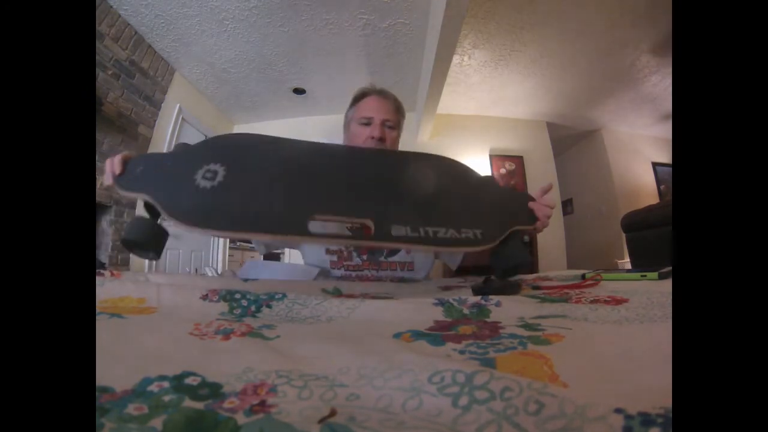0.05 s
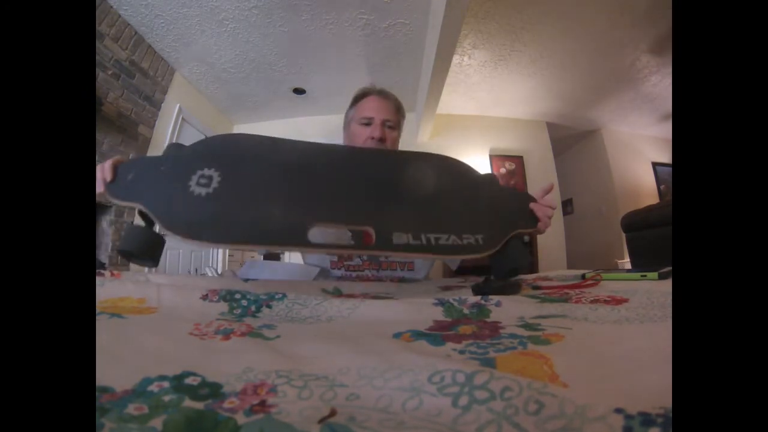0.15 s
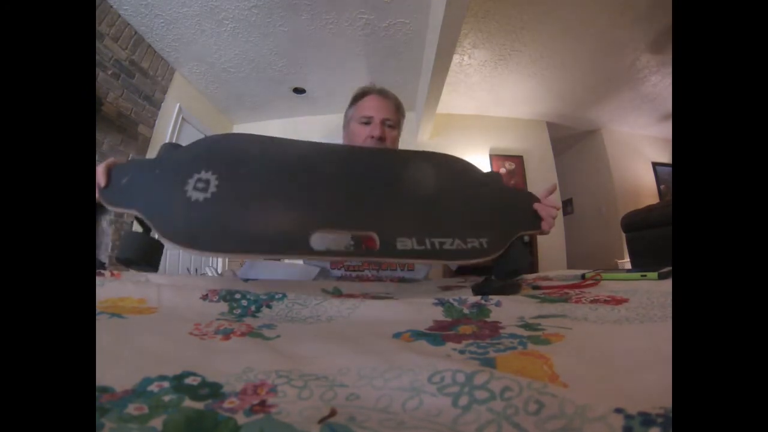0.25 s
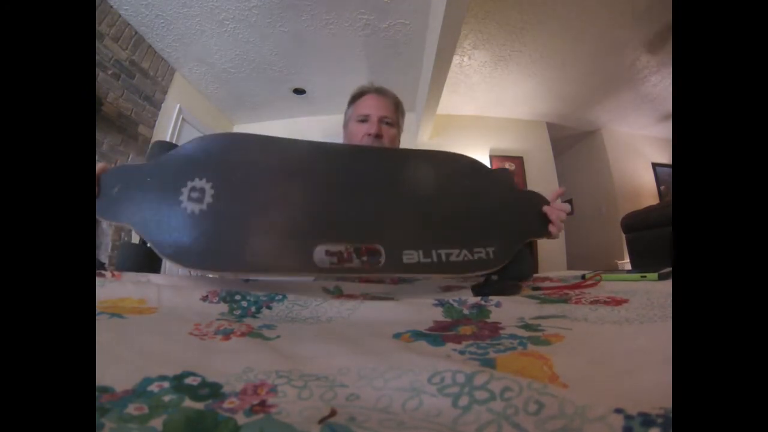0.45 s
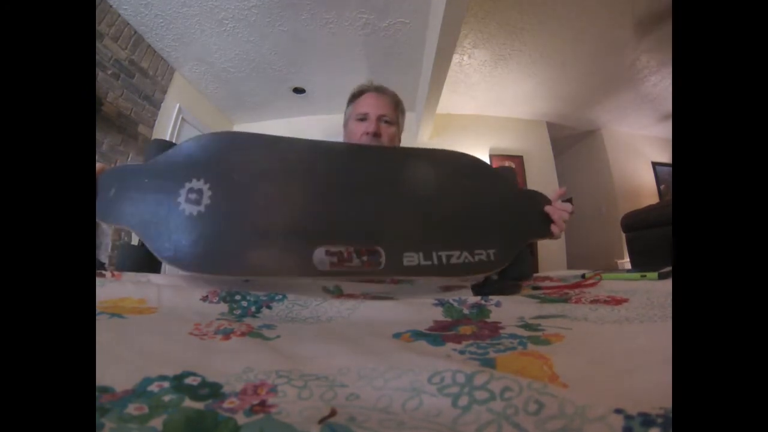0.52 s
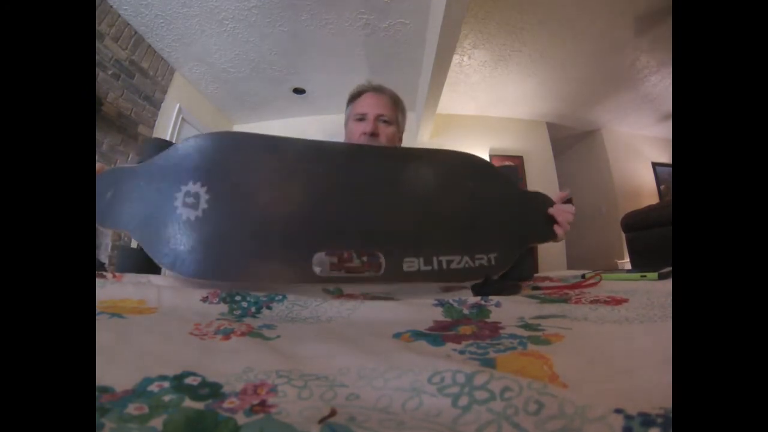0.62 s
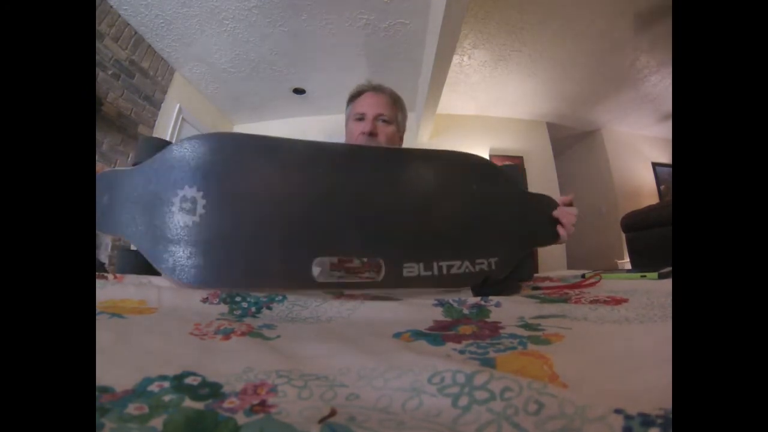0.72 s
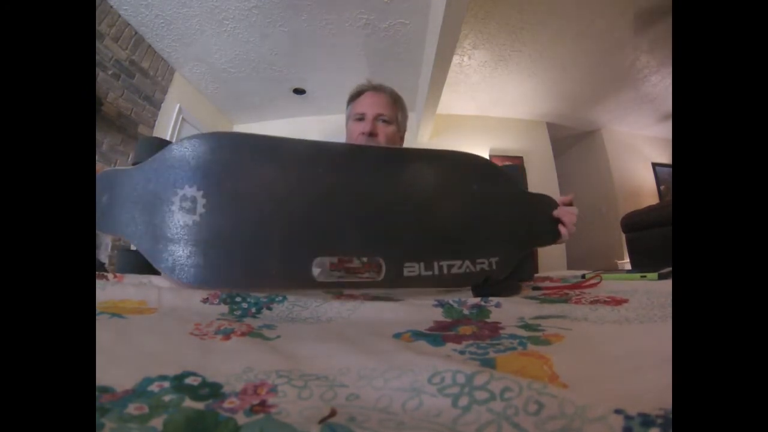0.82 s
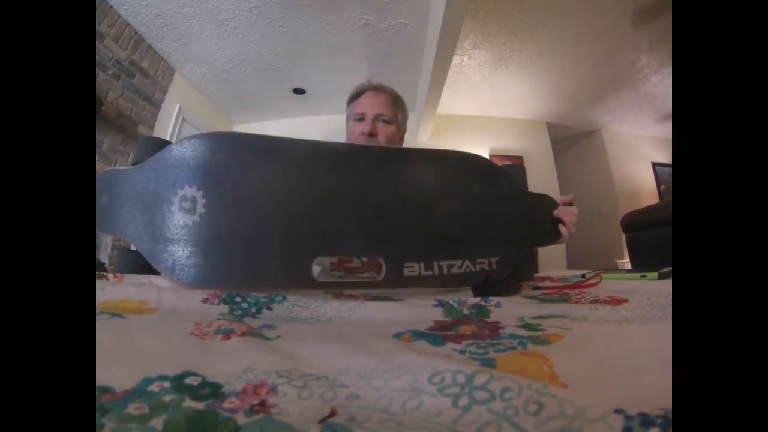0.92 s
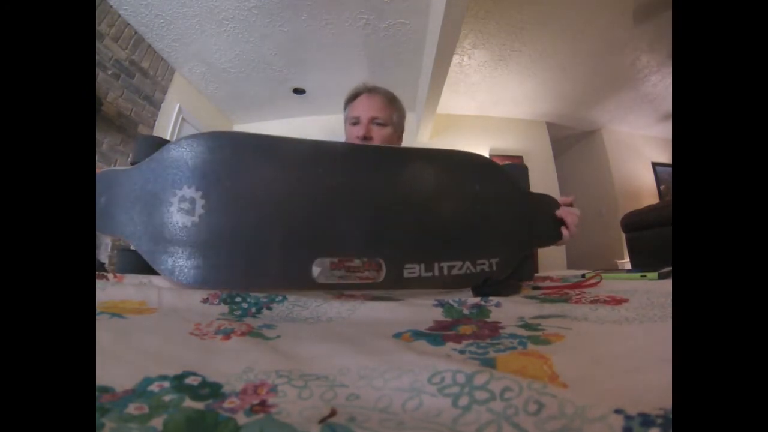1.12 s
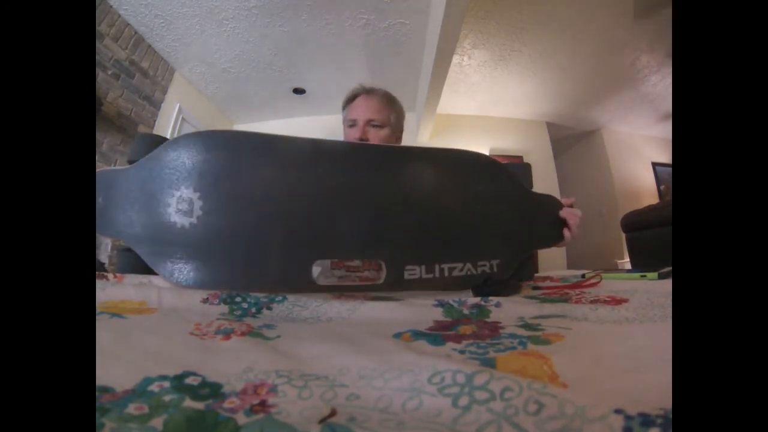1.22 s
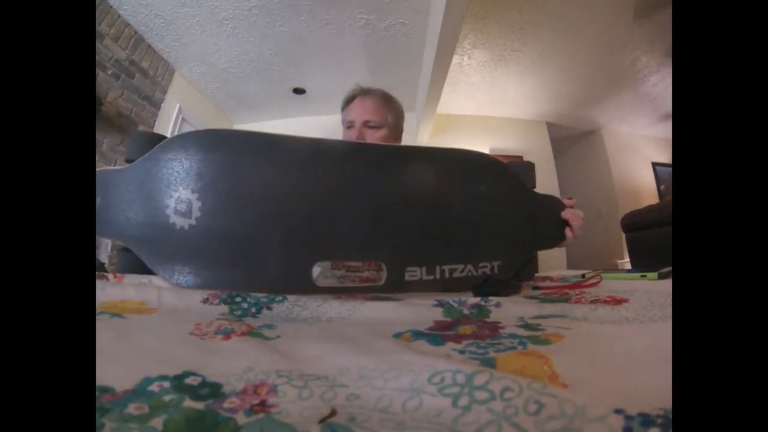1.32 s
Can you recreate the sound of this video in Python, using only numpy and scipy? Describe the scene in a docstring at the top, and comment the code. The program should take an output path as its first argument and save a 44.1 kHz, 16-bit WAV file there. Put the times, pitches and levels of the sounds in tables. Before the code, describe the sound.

Dull wooden skateboard thuds on a table, close to the microphone: first a booming bump, then lighter clacks and handling rubs, then a harder double knock, fading to faint creaks over soft room hum and hiss.

```python
"""A heavy skateboard is tipped onto its edge on a cloth-covered table, in a quiet living room.
A faint bump, then at 0.22 s the table top booms (decaying low modes) and the deck knocks (crack plus ring).
Near 0.46 s come damped blows and mount ticks; near 0.75 s a second burst holds the strongest knock.
Groans (gliding tones) and hands sliding (banded noise) fill the gaps, the last a faint low groan near 1.15 s.
Throughout lie a low rumble that swells near 0.5 s, a faint wavering hum and hiss."""
import sys
import numpy as np
from scipy import signal
from scipy.fft import rfft, irfft, next_fast_len
from scipy.io import wavfile
from scipy.ndimage import map_coordinates

SR = 44100
rng = np.random.default_rng(int(sys.argv[2]) if len(sys.argv) > 2 else 0)


def store_pcm(level_fs):
    """Save levels as 16-bit WAV."""
    pcm = np.round(np.clip(level_fs, -1, 1) * 32767).astype(np.int16)
    wavfile.write(sys.argv[1], SR, np.atleast_2d(pcm).T)


N = 59535


def table(rock_hz=28, rock_t60_s=0.17, upper_hz=96, upper_db=-16, upper_t60_s=0.21):
    """Each bump swings the loaded table top, with a slow rocking below and a weak mode above."""
    # bumps: (time [s], level [dB], pitch [Hz], rise [s], t60 [s], rocking of the legs re main mode [dB])
    bumps = [(.002, -31, 54.8, 0.008, 0.28, 0), (0.2193, -4.5, 56.2, 0.023, 0.18, -46),
             (0.313, -21.5, 52.3, 0.0061, 0.42, 1.5), (0.341, -19.5, 61.6, 0.0044, 0.23, -45),
             (0.439, -19.5, 50.3, 0.0055, 0.235, -10), (0.462, -19.5, 66.2, 0.0062, .22, 3),
             (0.495, -27, 46.6, 0.003, 0.43, -3), (0.558, -30, 51.5, .006, 0.11, -18),
             (0.601, -17.5, 55.1, 0.0095, 0.15, -10), (0.677, -32, 52, 0.016, 0.34, -18),
             (0.746, -26, 57, 0.0088, 0.2, -25), (0.7643, -13.5, 53.3, 0.011, 0.19, -6),
             (0.7835, -18.5, 58.3, 0.004, 0.12, -25), (.864, -29.5, 54.4, 0.002, 0.18, -11)]
    out = np.zeros(N)
    for start_s, db, hz, rise_s, t60_s, rock_db in bumps:
        t = since(start_s)
        modes = [(hz, 0, t60_s), (rock_hz, rock_db, rock_t60_s), (upper_hz, upper_db, upper_t60_s)]
        swing = sum(amp(g) * fade(t, d) * np.sin(2 * np.pi * f * t) for f, g, d in modes)
        out += amp(db) * (1 - np.exp(-t / rise_s)) * swing
    return out


def deck(mode_scatter_db=1.5, push_db=13, chatter_db=-10, crack_t60_s=0.051, ring_rise_s=0.00032, bass_hz=373):
    """Each contact cracks and rings the deck; a softer contact passes less treble."""
    # knocks: (time [s], level [dB], contact corner [Hz], bass weight [dB], ring re crack [dB])
    knocks = [(0.219, -39, 980, 7, -6.5), (0.231, -24.5, 597, 0.5, -20), (0.2536, -26, 545, 6.5, -12),
              (0.2563, -24.5, 1040, -3, -6), (0.2619, -28.5, 1070, -26, -5.5),
              (0.2701, -31.5, 1290, -14, -4), (0.2758, -29.5, 935, -2, -7.5), (0.296, -45.5, 454, 5.5, 0.5),
              (0.307, -51, 1100, -12, -6), (.34, -37.5, 1150, 3, -9), (.472, -37, 1050, -5.5, -5),
              (0.609, -49, 357, 9, -8), (0.7452, -26.5, 730, 1, -10.5), (0.7477, -24.5, 790, 1.5, -16),
              (.7502, -17, 775, 0, -23), (.7555, -36, 810, 5, -8.5), (.7608, -20, 840, -33, -12.5),
              (0.772, -37, 784, -14, -3.5), (0.898, -40, 624, -7, -5)]
    # ring of the deck: (pitch [Hz], level [dB], t60 [s]), before scatter
    deck_modes = [(183, -9.5, 0.18), (225.1, -2, 0.19), (264.6, -0.5, 0.13), (328.8, 1, 0.12),
                  (359, -5, 0.12), (458.5, -4.5, 0.11), (554, -9.5, 0.085), (643, -20.5, 0.37),
                  (713, -9.5, 0.071), (824, -5, 0.1), (917, -3.5, 0.06), (1047, -5, 0.069),
                  (1192, -2.5, 0.059), (1622, -10, 0.035)]
    # dull crack of a contact: (frequency [Hz], relative level [dB])
    crack_spectrum = [(60, -13), (150, -12), (330, 2), (560, -1), (780, -2), (1100, -11), (1500, -11.5),
                      (2050, -8.5), (2500, -15.5), (5000, -24.5), (12000, -68)]
    out = np.zeros(N)
    for start_s, db, corner_hz, bass_db, ring_db in knocks:
        t = since(start_s)
        ring = ringing(deck_modes, t, mode_scatter_db) * (1 - np.exp(-t / ring_rise_s))
        force = contact(start_s, push_db, chatter_db, crack_t60_s)
        crack = filtered(force, causal(crack_spectrum))

        def softness(f):
            """Bass shelf times a second-order low-pass."""
            shelf = 1 + (amp(bass_db) - 1) / (1 + 1j * f / bass_hz)
            return shelf / (1 - (f / corner_hz) ** 2 + 1.15j * f / corner_hz)

        out += amp(db) * in_room(filtered(crack + amp(ring_db) * ring, softness))
    return out


def dead_blows(rise_cycles=0.55):
    """Damped contacts of wheels and deck edge, over in a few cycles: low thuds and thin clacks."""
    # blows: (time [s], level [dB], pitch [Hz], t60 [cycles])
    blows = [(.2565, -25, 888, 18), (.459, -31.5, 276, 21), (.553, -34.5, 375, 12.3),
             (.4613, -20, 695, 5.4), (.4702, -28.5, 964, 10.5), (.4781, -19, 740, 5.2),
             (0.745, -13.5, 97.3, 5.2), (0.7478, -17.5, 378, 3.7), (0.7484, -28.5, 1546, 19.7),
             (.7595, -21, 723, 15.6)]
    out = np.zeros(N)
    for start_s, db, hz, t60_cycles in blows:
        cycles = hz * since(start_s)
        envelope = (1 - np.exp(-cycles / rise_cycles)) * fade(cycles, t60_cycles)
        out += amp(db) * envelope * np.sin(2 * np.pi * cycles)
    return out


def groans(waver_octaves=0.0967, flutter_db=1.0):
    """The deck sticks and slips on the table: low, gliding, unsteady tones."""
    # groans: (middle [s], half length [s], mean level [dB], pitch at middle [Hz], glide [octaves/s])
    groan_rows = [(0.283, 0.022, -32, 125, 6), (.375, 0.014, -46, 140, -2), (0.449, 0.041, -39.5, 100, -4),
                  (0.512, 0.032, -43.5, 152, 0), (.62, 0.018, -43.5, 180, -7),
                  (0.888, 0.025, -44.5, 138, -1), (0.905, 0.021, -43.5, 226, -2),
                  (1.054, 0.011, -47.5, 128, -1.5), (1.151, 0.063, -47.5, 124.5, 0.1)]
    out = np.zeros(N)
    for middle_s, half_s, db, hz, glide in groan_rows:
        t = since(0) - middle_s
        pitch_hz = hz * 2 ** (glide * t + waver_octaves * wobble(60))
        level = amp(db + flutter_db * wobble(69.56))
        swell = np.exp(-.5 * (t / half_s) ** 2)
        out += level * swell * np.sin(2 * np.pi * np.cumsum(pitch_hz) / SR)
    return out


def mounts(grit_t60_s=0.046, rise_s=0.00014, grit_db=-13.5, grit_hz=2660):
    """Play in the wheel mounts gives short ticks: a metallic ring with a little grit."""
    # ticks: (time [s], level [dB])
    ticks = [(0.22, -39.5), (0.226, -44), (0.324, -41), (0.3405, -42), (0.4718, -41.5), (0.48, -52),
             (.528, -49), (0.745, -45.5), (0.772, -53)]
    # ring of a mount: (pitch [Hz], level [dB], t60 [s]), before scatter
    mount_modes = [(930, -5, 0.024), (1522, 0.5, 0.013), (1670, -0.5, 0.022), (1800, -10, 0.013),
                   (2860, -17.5, 0.04), (3430, -10.5, 0.012)]
    out = np.zeros(N)
    for start_s, db in ticks:
        t = since(start_s)
        grit = noise(lambda f: -20 * np.log10(1 + (f / grit_hz) ** 3)) * fade(t, grit_t60_s)
        tick = ringing(mount_modes, t, scatter_db=1.5) + amp(grit_db) * grit
        out += amp(db) * tick * (1 - np.exp(-t / rise_s))
    return out


def slides():
    """Hands and cloth slide on the deck: brief soft swells of friction noise, each in its own band."""
    # slides: (middle [s], half length [s], level [dB], centre [Hz], width [octaves])
    slide_rows = [(.425, 0.0048, -59, 1240, 0.57), (.436, 0.012, -47, 675, 0.12),
                  (.478, 0.019, -67.5, 3400, .7), (.522, 0.0098, -64, 3530, 0.91),
                  (.597, 0.0088, -46.5, 570, 0.72), (.79, 0.0047, -51.5, 750, 0.34),
                  (0.8, 0.025, -70, 3200, .6), (0.828, 0.064, -59.5, 760, 0.29),
                  (1.086, 0.0096, -63.5, 2640, 0.12), (1.087, 0.037, -74.5, 4700, 0.34)]
    out = np.zeros(N)
    for middle_s, half_s, db, hz, width in slide_rows:
        rub = noise(lambda f: -20 * np.log10(1 + np.abs(np.log2((f + 1) / hz) / width) ** 4))
        out += amp(db) * rub * np.exp(-.5 * ((since(0) - middle_s) / half_s) ** 2)
    return out


def background(rumble_hz=48, air_db=-51, hum_waver_db=-2.5):
    """Deep rumble in a log-parabolic band, steady shaped hiss, and hum wavering in level and phase."""
    # rumble: (time [s], level [dB])
    rumble_levels = [(0, -48.5), (.17, -48.5), (.5, -41), (.9, -43), (1.1, -52), (1.35, -48)]
    # steady room noise: (frequency [Hz], relative density [dB])
    air_spectrum = [(20, -1.5), (55, -6), (85, -18), (140, -3), (190, -6), (300, -8), (480, -15.5),
                    (850, -14.5), (1200, -26), (2100, -33), (3000, -32.5), (4200, -36), (7000, -39.5),
                    (10500, -42.5), (12000, -40), (13200, -45), (15000, -44.5)]
    # hum: (pitch [Hz], mean level [dB])
    hum_tones = [(120, -67.5), (224, -58)]
    t = since(0)
    hum = np.zeros(N)
    for hz, db in hum_tones:
        level = amp(db + hum_waver_db * wobble(5.27))
        hum += level * np.sin(2 * np.pi * hz * t + 0.75 * wobble(2.22))
    rumble = noise(lambda f: -9 * np.log2((f + 1) / rumble_hz) ** 2)
    rumble *= amp(np.interp(t, *np.transpose(rumble_levels)))
    air = amp(air_db) * noise(lambda f: along(air_spectrum, f))
    return air + rumble + hum


def contact(start_s, push_db, chatter_db, t60_s):
    """The force of one contact: a single push, then dying chatter."""
    force = amp(chatter_db) * rng.standard_normal(N) * fade(since(start_s), t60_s)
    force[round(start_s * SR)] += amp(push_db)
    return force


def ringing(modes, t, scatter_db, detune=.015):
    """Struck (Hz, dB, t60 s) modes, each with a small random shift of level and pitch."""
    out = np.zeros(N)
    for hz, db, t60_s in modes:
        level = amp(db + scatter_db * rng.normal())
        shifted_hz = hz * (1 + detune * rng.normal())
        out += level * fade(t, t60_s) * np.sin(2 * np.pi * (shifted_hz * t + rng.random()))
    return out


def in_room(x, room_db=-3.5, delay_s=0.0092):
    """A sound plus the walls' answer: a random tail whose decay time depends on frequency."""
    # reverberation: (frequency [Hz], t60 [s])
    room_t60 = [(100, 0.74), (260, 0.18), (700, 0.27), (1800, 0.28), (8000, 0.87)]
    hz, t, z = signal.stft(rng.standard_normal(SR // 2), SR, nperseg=256)
    decay = fade(t - delay_s, along(room_t60, hz)[:, None])
    tail = signal.istft(z * decay, SR, nperseg=256)[1]
    return x + amp(room_db) * signal.fftconvolve(x, tail / np.linalg.norm(tail))[:N]


def causal(points):
    """Minimum-phase response through (Hz, dB) points, of rms 1."""
    def response(f):
        # fold the cepstrum onto positive time
        c = irfft(np.log(amp(along(points, f))))
        c[1:len(c) // 2] *= 2
        c[len(c) // 2 + 1:] = 0
        h = np.exp(rfft(c))
        return h / np.sqrt(np.mean(np.abs(h) ** 2))
    return response


def amp(db):
    """Decibels to gain."""
    return 10 ** (np.asarray(db) / 20)


def unit(x):
    """Scale to rms 1."""
    return x / np.sqrt(np.mean(x ** 2) + 1e-20)


def along(points, hz):
    """Read (Hz, value) points on a log axis."""
    f, v = np.transpose(points)
    return np.interp(np.log(hz + 1), np.log(f + 1), v)


def since(s):
    """Seconds since s, zero before it."""
    return np.maximum(np.arange(N) / SR - s, 0)


def fade(t, t60):
    """Exponential decay, 60 dB per t60, that starts when t leaves zero."""
    return (t > 0) * np.exp(-np.log(1000) * t / t60)


def filtered(x, response):
    """x times a response of frequency."""
    m = next_fast_len(N + SR // 2)
    return irfft(rfft(x, m) * response(np.fft.rfftfreq(m, 1 / SR)), m)[:N]


def noise(spectrum_db):
    """Noise of rms 1 whose spectrum is a function of frequency."""
    return unit(filtered(rng.standard_normal(N), lambda f: amp(spectrum_db(f))))


def wobble(rate):
    """A smooth random curve, rate knots a second."""
    return map_coordinates(rng.standard_normal(N // 100), [np.arange(N) * rate / SR], mode="mirror")


def scene():
    """Table, groans and background stay dry; knocks, blows, ticks and slides also fill the room."""
    reverberant = in_room(dead_blows() + mounts() + slides())
    return (table() + groans() + deck() + reverberant + background())[None]


def record(dry, top_hz=15290):
    """The recorder keeps nothing above its band limit."""
    return np.array([filtered(x, lambda f: f < top_hz) for x in dry])


dry = scene()
out = record(dry)
store_pcm(out)
```